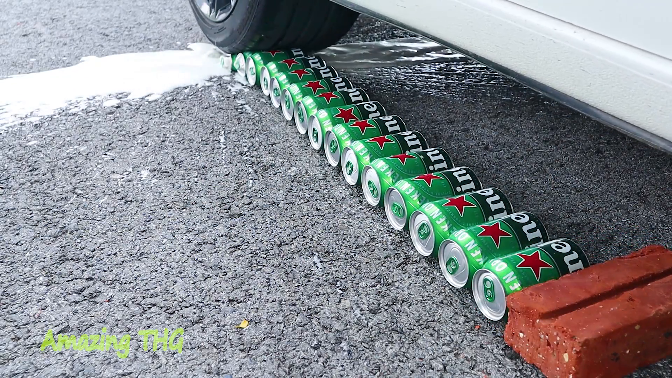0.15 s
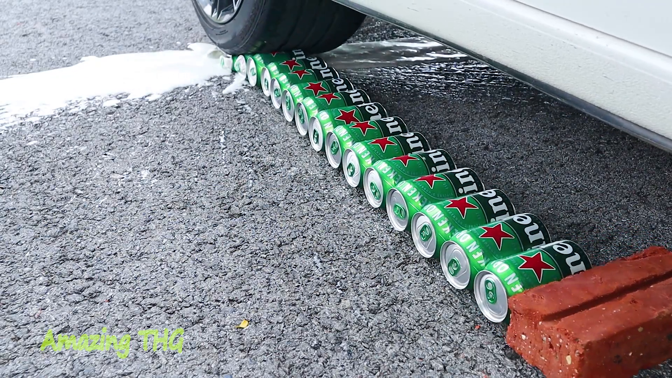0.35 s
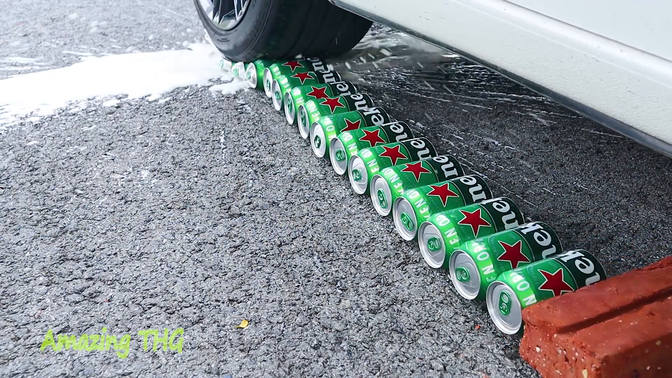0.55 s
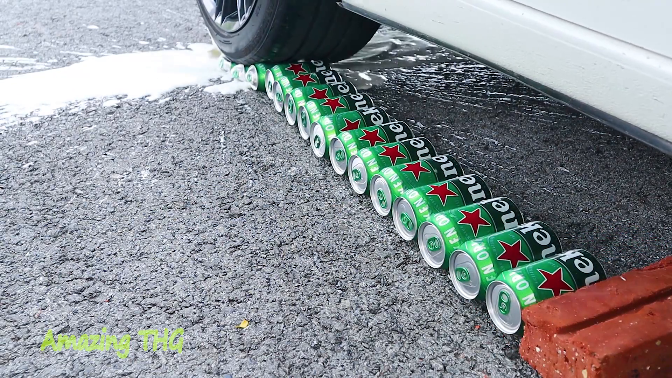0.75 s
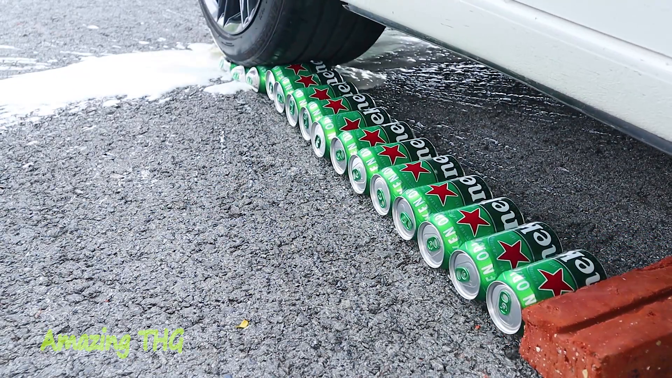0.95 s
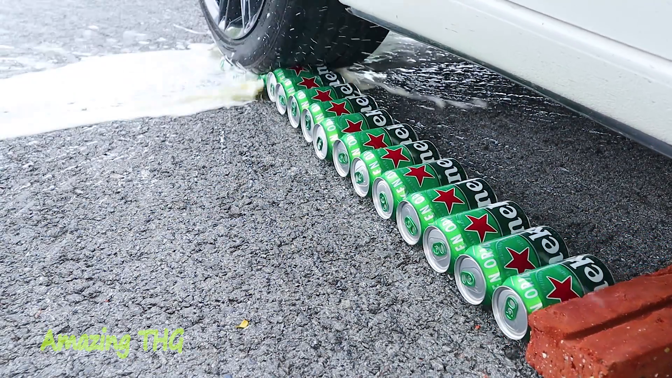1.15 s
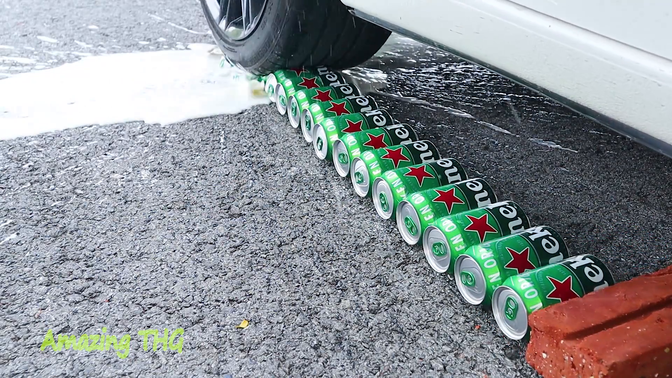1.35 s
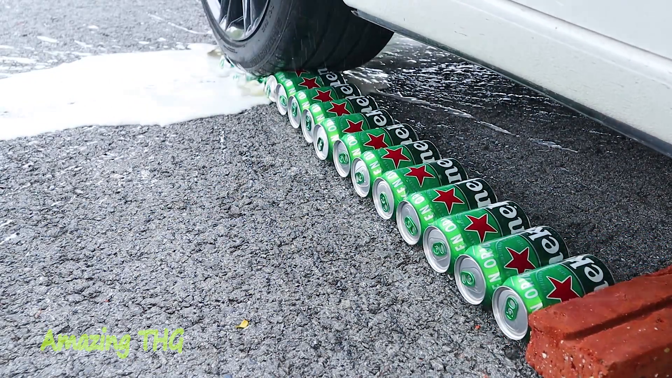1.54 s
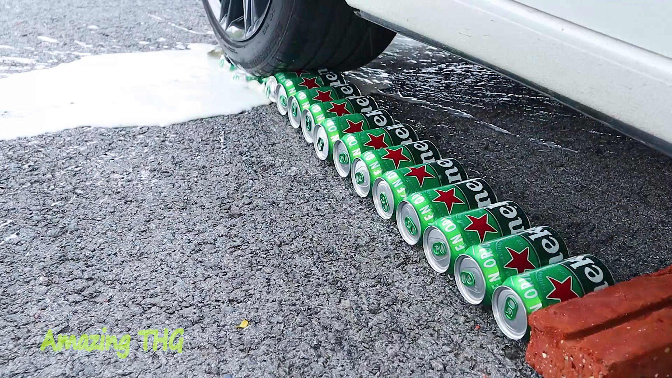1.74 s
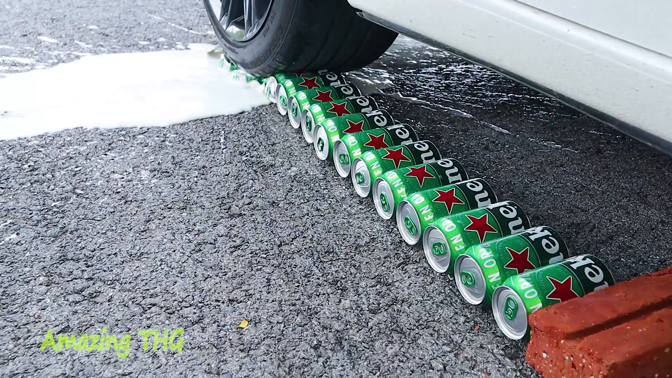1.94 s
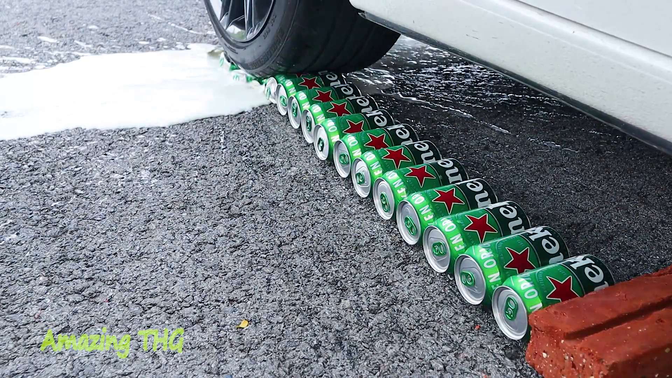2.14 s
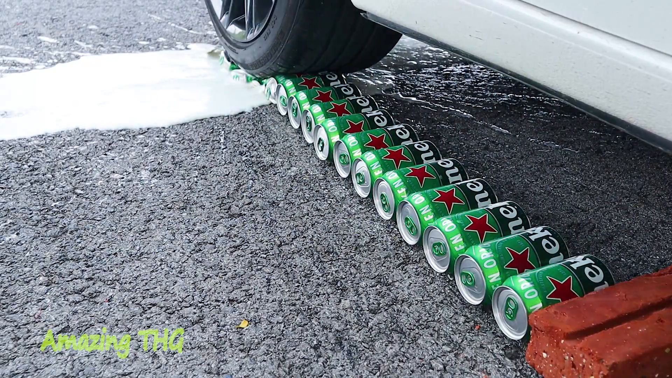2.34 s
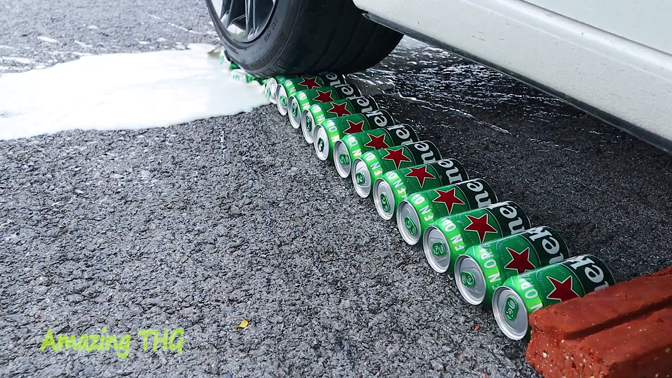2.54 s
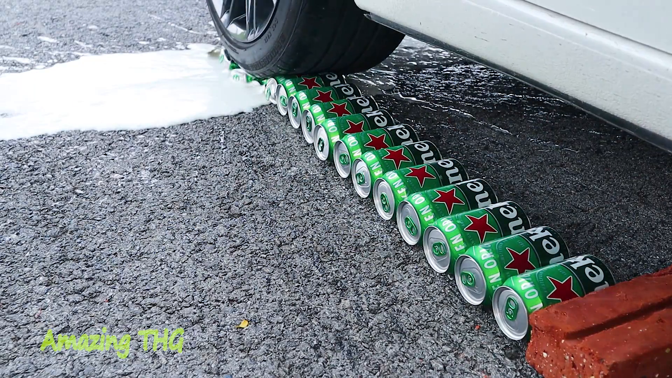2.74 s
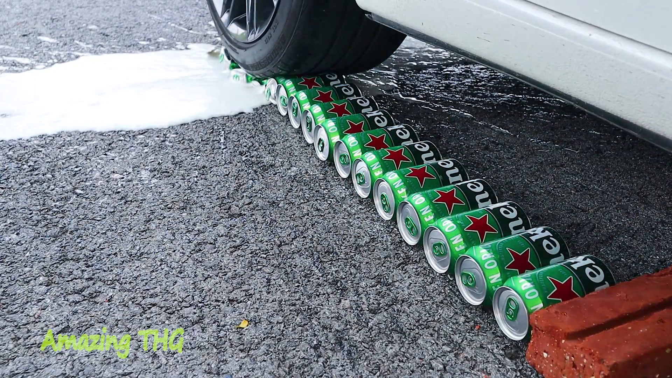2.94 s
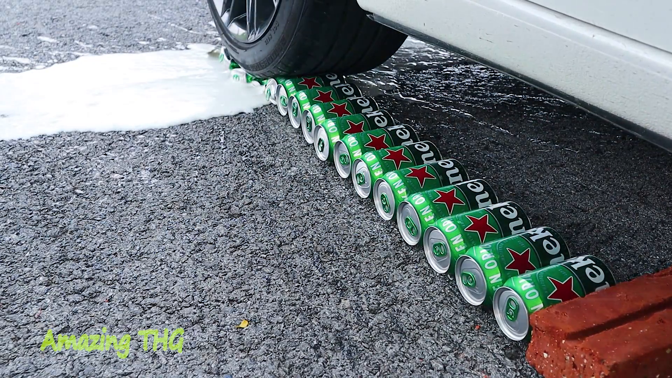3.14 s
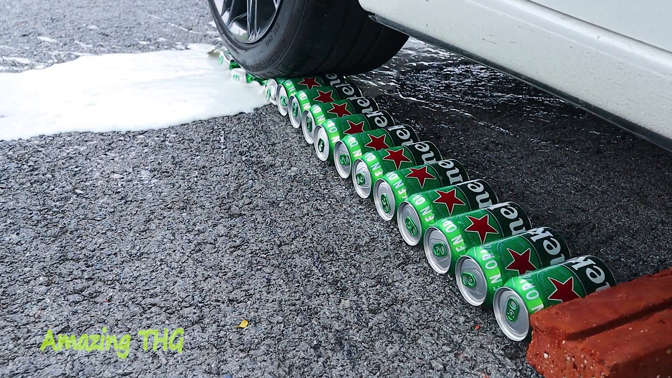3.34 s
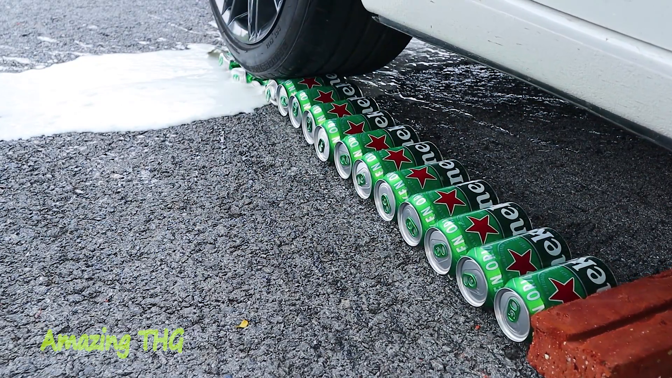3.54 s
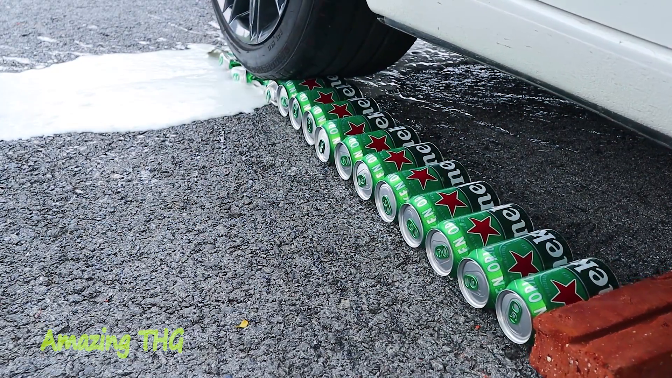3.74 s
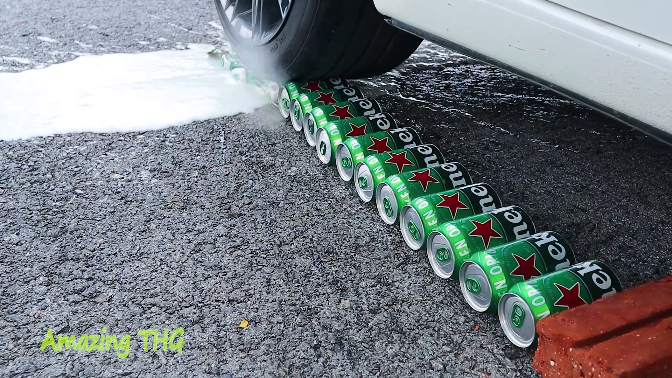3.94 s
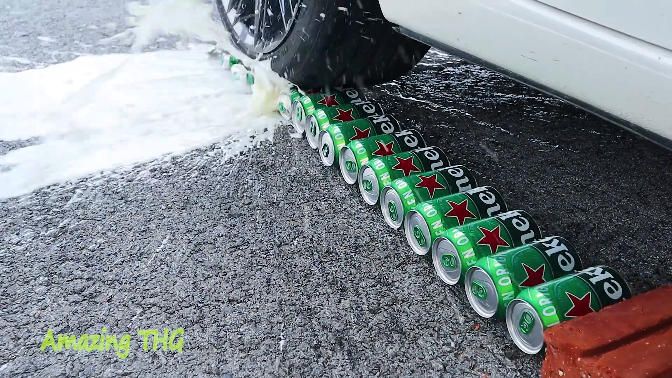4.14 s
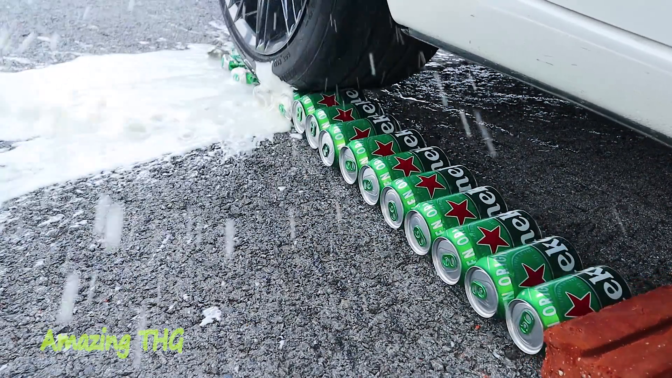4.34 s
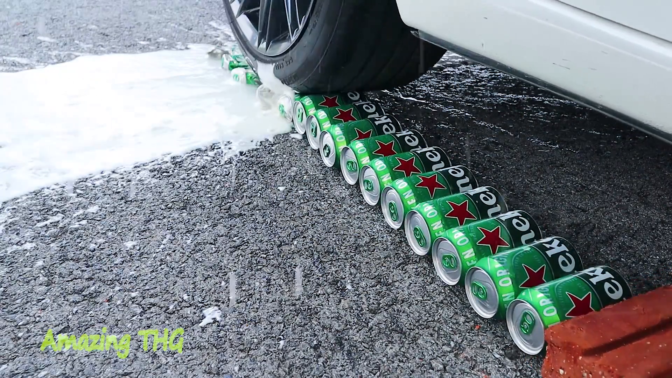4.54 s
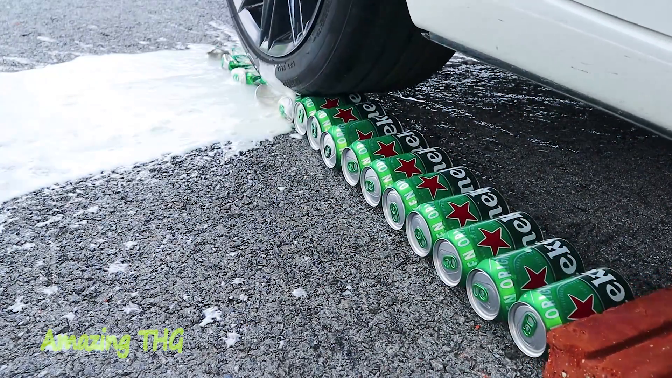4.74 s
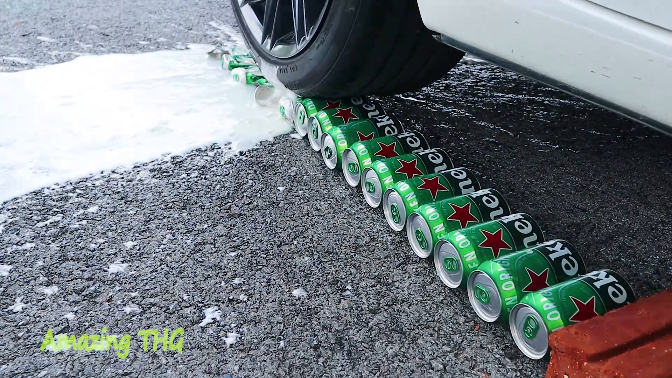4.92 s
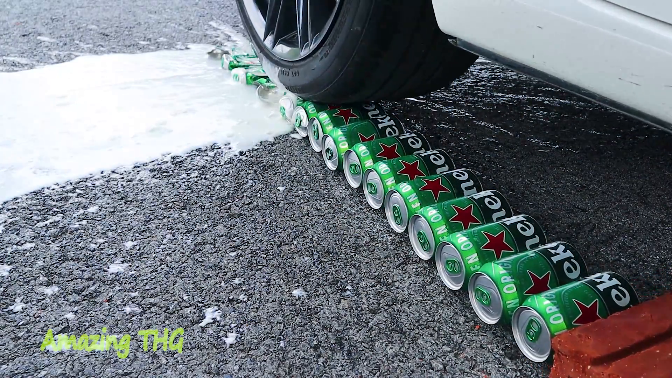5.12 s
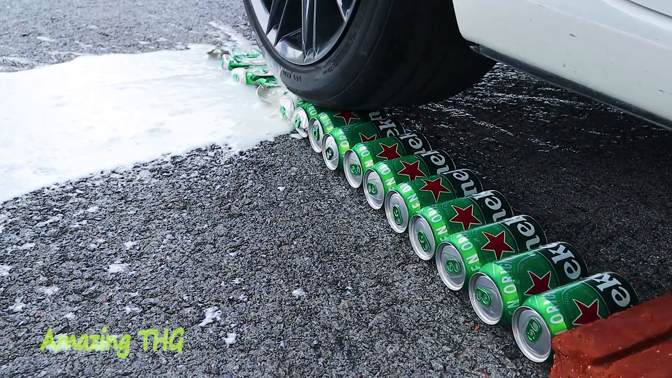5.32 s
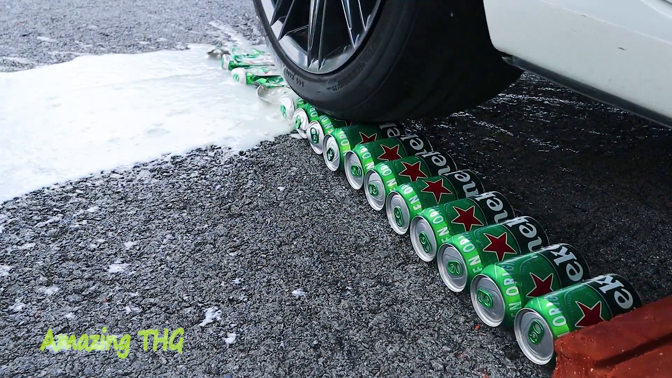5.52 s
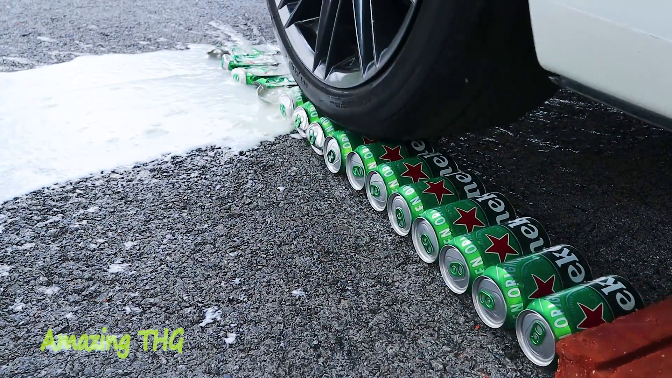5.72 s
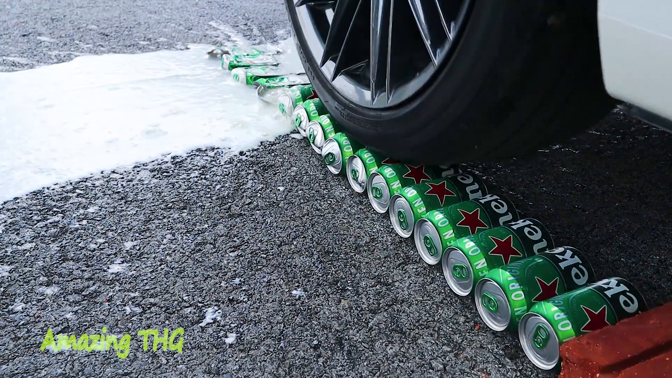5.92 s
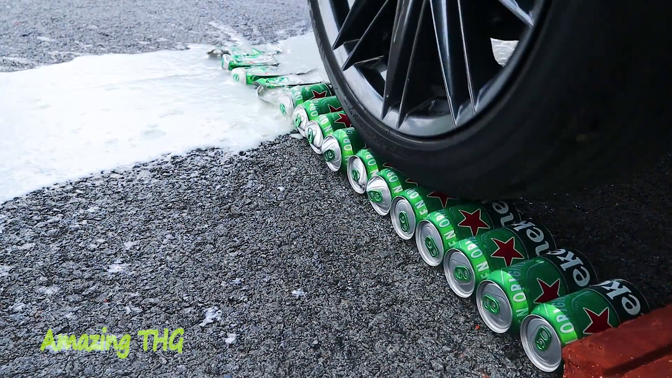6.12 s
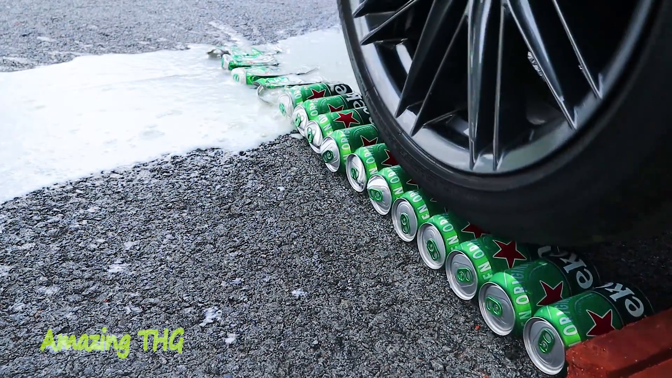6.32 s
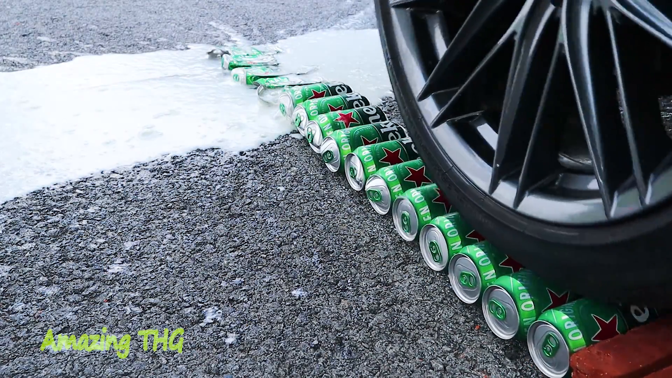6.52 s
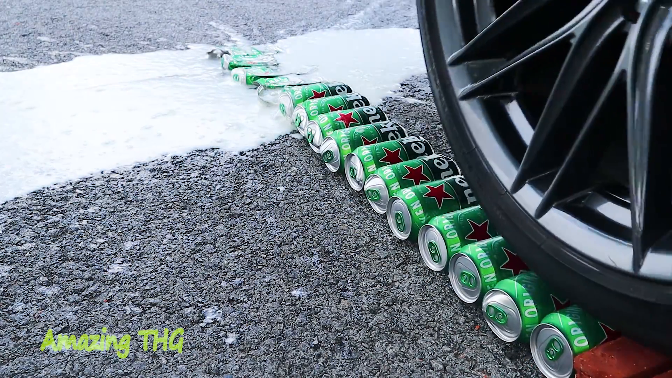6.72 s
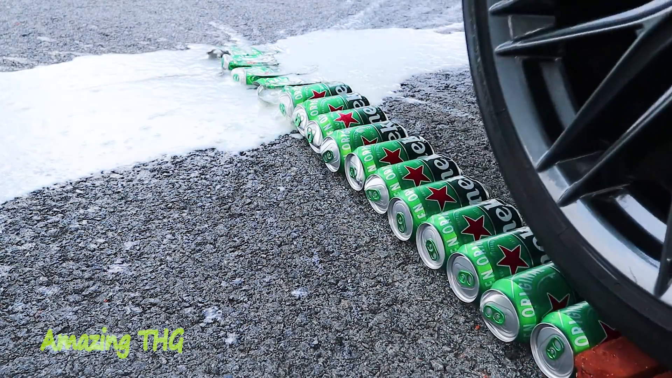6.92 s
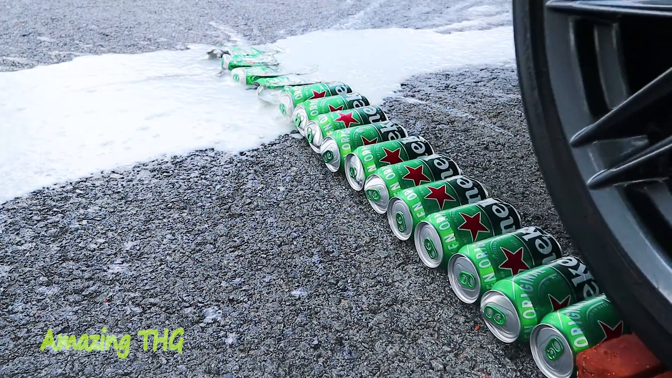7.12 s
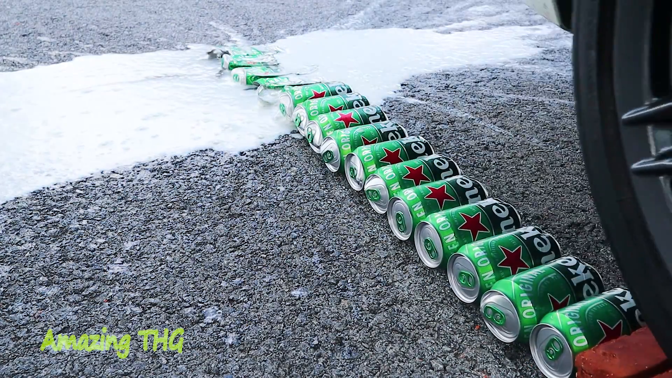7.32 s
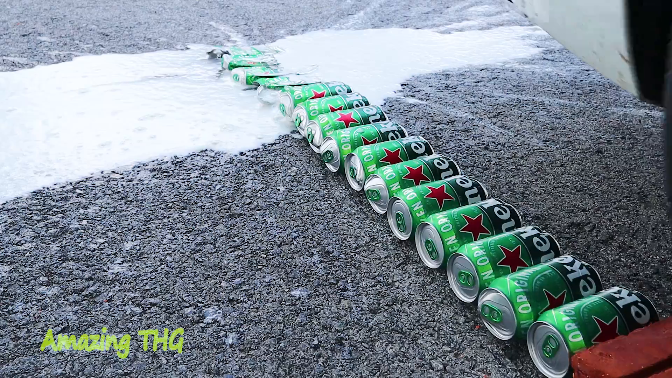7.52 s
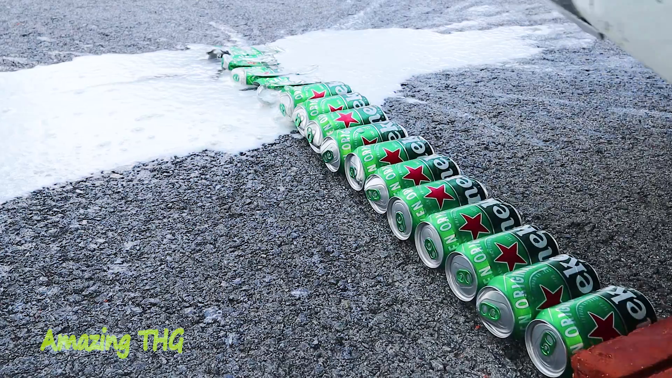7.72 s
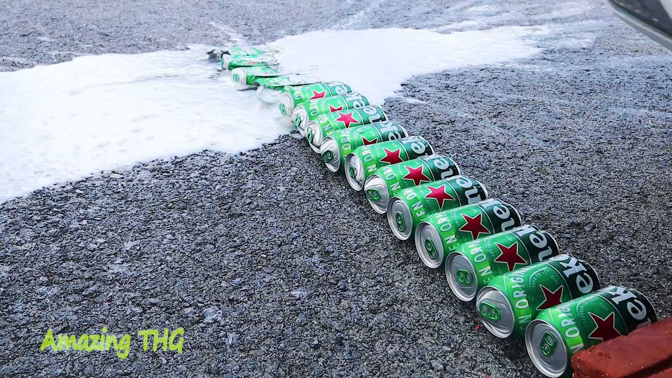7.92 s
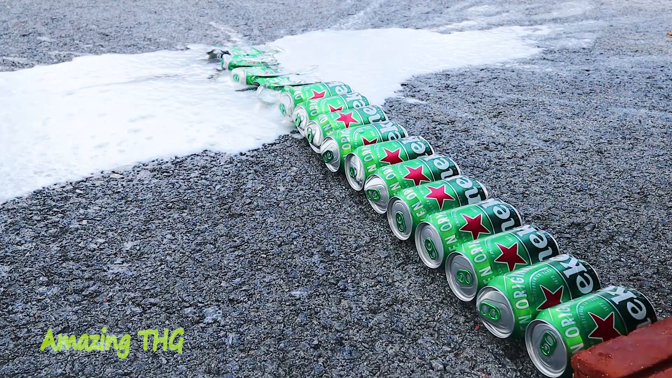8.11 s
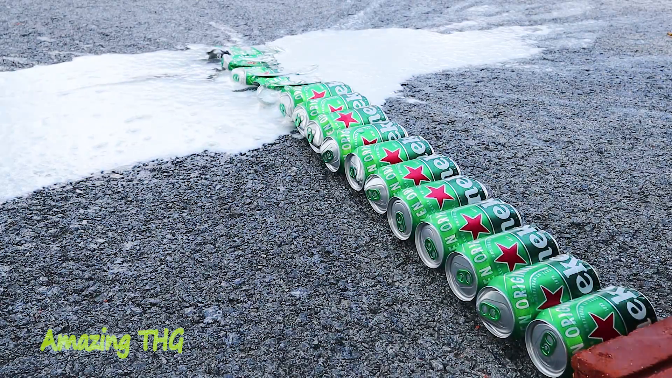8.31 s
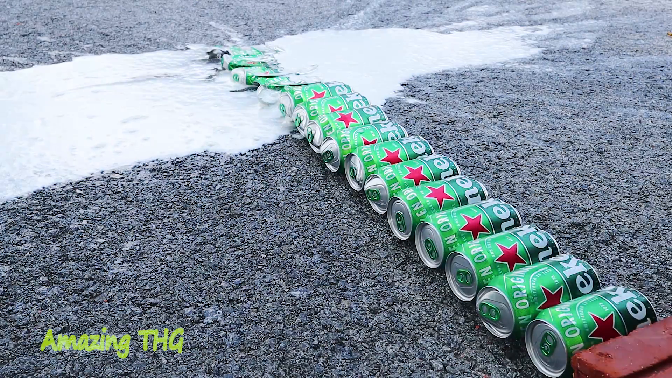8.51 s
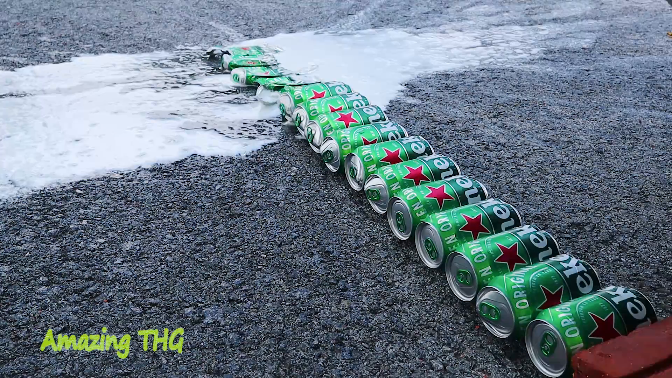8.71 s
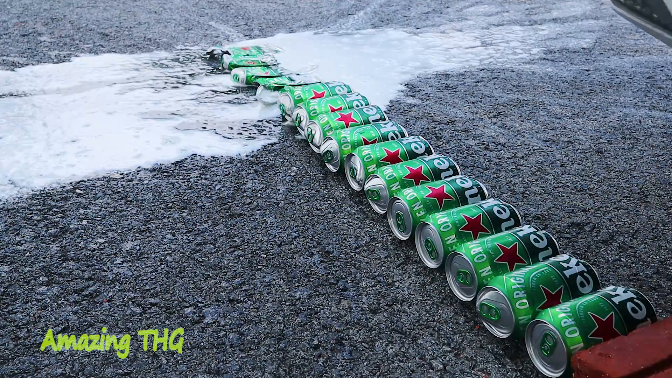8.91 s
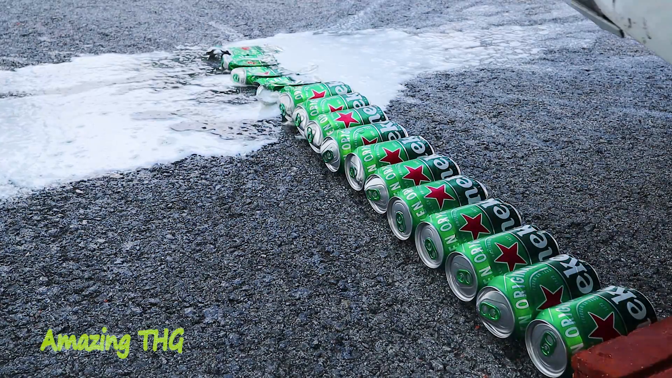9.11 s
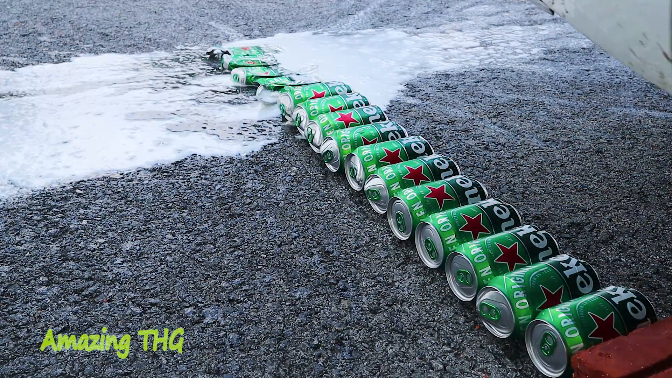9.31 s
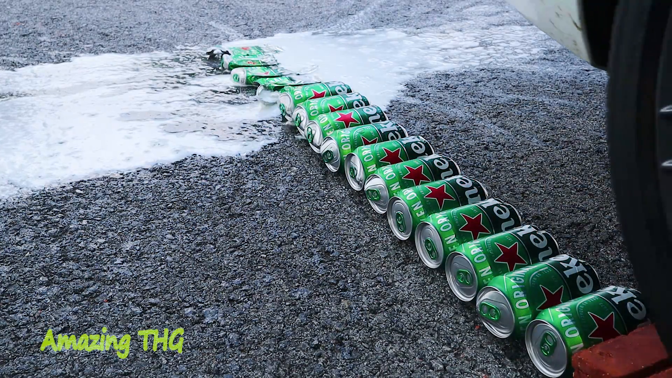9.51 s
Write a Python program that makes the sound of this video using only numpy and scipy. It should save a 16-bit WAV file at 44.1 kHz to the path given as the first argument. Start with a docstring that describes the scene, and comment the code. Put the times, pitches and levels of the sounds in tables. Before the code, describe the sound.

Sharp, loud crunching pops of drink cans being crushed by a creeping car wheel, spraying and fizzing, then quiet road noise and faint idling.

```python
"""Full aluminium cans buckle one after another under a car tyre creeping over asphalt.
Noisy bursts of small yields ring the can walls; the jolts also ring the air in the tyre and the wheel.
Small dents, rubber slips, a creak, rough swells of noise and spraying, fizzing foam lie between the cracks.
Behind them are street noise, an idling engine built on its shaft speed, a faint rattle and short whistles."""
import sys
import numpy as np
from scipy import signal
from scipy.fft import rfft, irfft
from scipy.io import wavfile
from scipy.ndimage import uniform_filter1d

SR = 44100
rng = np.random.default_rng(int(sys.argv[2]) if len(sys.argv) > 2 else 0)


def bounce(signal):
    """Save signal as a 16-bit WAV file at the path given by the first command-line argument."""
    frames = np.transpose(np.atleast_2d(signal))
    limited = np.clip(frames, -1, 1)
    pcm = np.round(limited * 32767).astype(np.int16)
    wavfile.write(sys.argv[1], SR, pcm)


def natural_amplitude(level_db):
    """Convert a level in decibels to a linear amplitude factor, elementwise."""
    exponent = np.asarray(level_db, float) / 20
    return 10 ** exponent


N = 421596
T = np.arange(N) / SR


def band(x, lo_hz, hi_hz):
    """Causal band-pass."""
    return signal.sosfilt(signal.butter(2, [lo_hz, hi_hz], "bandpass", fs=SR, output="sos"), x)


def unit(x):
    """Scale to rms 1."""
    return x / np.sqrt(np.mean(x ** 2))


def top(x):
    """Scale to peak 1."""
    return x / np.max(np.abs(x))


def curves(table):
    """Columns of a table, drawn as straight lines over time."""
    s, *columns = np.transpose(table)
    return [np.interp(T, s, c) for c in columns]


def coloured(points):
    """Noise of rms 1 with the given spectrum."""
    hz, db = np.transpose(points)
    f = np.maximum(np.arange(N // 2 + 1) * SR / N, 1)
    shape = natural_amplitude(np.interp(np.log(f), np.log(hz), db))
    return unit(irfft(rfft(rng.standard_normal(N)) * shape, N))


def walk(rate):
    """Random levels held 1 / rate s and slewed twice; spread 1."""
    k = int(SR / rate)
    held = np.repeat(rng.standard_normal(N // k + 1), k)
    return unit(uniform_filter1d(uniform_filter1d(held, k), k)[:N])


def swell(span):
    """A smooth rise and fall between two times."""
    return np.sin(np.pi * np.clip((T - span[0]) / (span[1] - span[0]), 0, 1))


def ring(x, hz, t60):
    """One decaying mode, driven by x."""
    pole = np.exp(2j * np.pi * hz / SR - np.log(1000) / (t60 * SR))
    return signal.lfilter([1], [1, -pole], x).imag


def ragged(count, ms, lump=32, lump_db=5.0, rise_ms=1.0):
    """Noises of 8192 samples in uneven lumps, rising quickly and dying with time constant ms."""
    t = T[:8192]
    lumps = natural_amplitude(lump_db * rng.standard_normal((count, len(t) // lump))).repeat(lump, axis=1)
    envelope = (1 - np.exp(-t / (rise_ms / 1000))) * np.exp(-t / (ms / 1000))
    return rng.standard_normal((count, len(t))) * lumps * envelope


def add(out, s, x):
    """Mix x into out from time s."""
    i = int(s * SR)
    out[i:i + len(x)] += x[:N - i]


# walls giving way: t/s, level/dB, ring centre f/Hz, thud level/dB re the ring, crumpling decay/ms
CRACKS = [(0.468, 2.5, 1701, -2.5, 18), (0.505, -1.5, 1722, -5, 27), (0.576, -6, 1426, -11, 41),
          (0.674, -23, 1436, 8, 25.5), (1.122, 2, 1503, 1, 9), (1.428, 1, 1612, -10, 4.5),
          (1.591, -5, 1353, -16.5, 26.5), (2.066, -18, 1510, -5.5, 29), (4.048, 1.5, 1285, 3.5, 8.7),
          (4.071, -3.5, 1543, -11, 47), (5.191, 1, 1529, -10, 20), (5.269, -24, 1300, 0, 17),
          (5.597, 0.5, 1590, -8.5, 19), (5.656, -5.5, 1137, -17, 17.34), (5.859, 2.5, 1455, -11.5, 9),
          (6, 1, 1636, -11, 9), (6.159, 1, 1497, -15.5, 10), (6.69, 3, 1560, -12.5, 6.2),
          (6.952, -23, 2000, -37.5, 22)]
# small dents and splashes: t/s, level/dB, note f/Hz, snap level/dB re the note
TICKS = [(0.054, -35.5, 1470, -34), (0.072, -30.5, 850, -22), (0.092, -39, 1900, 5), (0.24, -33, 1690, -27),
         (0.248, -27, 1510, -21), (0.269, -29.5, 1680, -27), (0.364, -28, 780, -10), (0.385, -31, 930, -17),
         (0.417, -31.5, 1900, -29.5), (0.717, -48, 2880, -12), (0.752, -32, 850, -35),
         (0.913, -35.5, 1520, -5), (1.094, -23.5, 2060, -29), (1.245, -19.5, 3330, -9),
         (1.267, -24, 3280, 5), (1.29, -41, 2380, -1), (1.313, -34, 2330, -4), (1.337, -22, 2405, -2),
         (1.561, -30.5, 3660, -6), (1.748, -30, 3630, -14), (1.771, -29.5, 3640, -17),
         (1.849, -45, 3680, -15), (1.916, -26, 1850, 4), (1.93, -29, 3410, -9), (1.963, -40, 2470, -3),
         (1.987, -36.5, 3300, -2), (2.232, -43, 3160, 0.5), (3.816, -24.5, 1907, -27),
         (3.857, -30, 1660, -36), (3.924, -31, 1710, -14), (4.152, -23.5, 890, -28),
         (4.186, -35, 1790, -12), (4.291, -32, 1200, -37.5), (4.395, -34.5, 1296, -21),
         (4.466, -39.5, 1440, -25), (4.494, -32.5, 1190, -26), (4.512, -45, 2860, -11),
         (4.54, -19.5, 2350, -33), (4.613, -24, 1110, -32), (4.691, -35, 1580, -18),
         (4.719, -30, 1180, -30), (4.824, -35, 2520, -13), (5.012, -25.5, 1100, -7),
         (5.114, -31.5, 766, -36), (5.748, -23, 1460, -38), (5.784, -32.5, 2830, -27),
         (6.799, -36, 1750, -22.5), (6.831, -29, 1900, -11), (7.425, -33.5, 1726, -25),
         (7.498, -34, 1114, -41)]
# the tread slipping on a can, in runs: t/s, level/dB
SLIPS = [(0.311, -29), (0.324, -28), (0.33, -31), (0.337, -38), (2.363, -26.5), (2.646, -39),
         (2.692, -32.5), (2.925, -34.5), (2.979, -22.5), (3.041, -19), (3.206, -25), (3.299, -27),
         (3.364, -28.5), (3.404, -30), (3.465, -28), (3.501, -28.5), (3.524, -29.5), (3.543, -33),
         (3.564, -32), (3.596, -30.5), (3.613, -35), (3.624, -27.5), (3.656, -33.5), (3.667, -40),
         (3.677, -34), (3.701, -36), (3.725, -37.5)]
# drops of foam hitting metal: t/s, level/dB
SPATTERS = [(.94, -43.5), (1.179, -40.5), (4.411, -45), (4.706, -39.5), (4.921, -49), (5.456, -41),
            (5.773, -41), (6.67, -47.5), (6.68, -37), (6.733, -39), (6.779, -45.5), (6.856, -44.5)]
# something loose knocking under the car: t/s, level/dB
KNOCKS = [(8.694, -47), (8.722, -39.5), (8.765, -37), (8.812, -40)]
ECHO_T60_S, ECHO_DB = 0.081, -17


def cans():
    """Cracks, ticks, slips, spatters and knocks, smeared by echoes between road and car floor."""
    out = np.zeros(N)
    events = [(CRACKS, buckle), (TICKS, tick), (SLIPS, slip), (SPATTERS, spatter), (KNOCKS, knock)]
    for table, sound in events:
        for s, db, *colour in table:
            add(out, s, natural_amplitude(db) * sound(*colour))
    t = T[:SR // 2]
    decay = np.exp(-np.log(1000) * t / ECHO_T60_S) * (1 - np.exp(-t / 0.00017))
    tail = band(rng.standard_normal(len(t)), 330, 3100) * decay
    echo = signal.fftconvolve(out, tail / np.linalg.norm(tail))[:N]
    return band(out + natural_amplitude(ECHO_DB) * echo, 120, 19845)  # the microphone passes little bass


# modes of a can wall: f/Hz, level/dB, t60/s
WALL_MODES = [(1300, -5, .018), (1460, 0, .025), (1620, 0, .018), (1900, -1, .016), (2150, -3, .014),
              (2470, -5, .012), (2800, -6, .012), (3200, -7, .01), (3700, -8, .009), (4400, -10, .008),
              (5500, -12, .006)]
BUCKLE_MS, BUCKLE_RISE_MS, PANEL_T60_S = 2, 2.2, 0.025
CRUMPLE_DB = -15
SNAP_DB, SNAP_PER_THUD = -23.5, 0.05  # the crease snaps louder with more thrown liquid: dB, dB per dB of thud
WET_DAMPING = .8  # thrown liquid chokes the panel: dB per dB of thud over -9


def buckle(centre_hz, thud_db, crumple_ms):
    """Small yields ring the wall modes near the centre; liquid thuds, the crease snaps, crumpling follows."""
    yields = ragged(count=3, ms=BUCKLE_MS, rise_ms=BUCKLE_RISE_MS)
    wall = np.zeros(8192)
    for hz, db, t60 in WALL_MODES:
        octaves = np.log2(hz / centre_hz)
        reach_db = 30 * octaves if octaves < 0 else -6 * octaves  # modes below the centre hardly join in
        detune = 1 + 0.06 * rng.standard_normal()
        wall += natural_amplitude(db + reach_db) * top(ring(yields[0], hz * detune, t60))
    # the panel that folds rings clearest
    choke = natural_amplitude(-WET_DAMPING * max(thud_db + 9, 0))
    wall += 1.4 * choke * top(ring(yields[0], centre_hz, PANEL_T60_S))

    after = ragged(count=2, ms=crumple_ms, lump=64, lump_db=3, rise_ms=4)
    crumple = 0.86 * top(band(after[0], .85 * centre_hz, 1.8 * centre_hz))
    crumple += 0.45 * top(band(after[1], 370, 4000))

    thud = band(yields[1], .23 * centre_hz, 0.61 * centre_hz)
    late_snaps = natural_amplitude(CRUMPLE_DB) * after[1] * np.exp(-T[:8192] / 0.041)
    snap = band(yields[2] + late_snaps, 4600, 14000)
    snap_db = SNAP_DB + SNAP_PER_THUD * thud_db
    crack = top(band(wall, 0.85 * centre_hz, 5600)) + natural_amplitude(thud_db) * top(thud) + natural_amplitude(snap_db) * top(snap)
    return top(crack) + natural_amplitude(CRUMPLE_DB) * crumple


# a chattering lid: multiple of its note, level/dB
LID_NOTES = [(.7, -9.5), (1.12, -7.5), (1.8, -10.5), (2.1, -14.5)]
DENT_MS, LID_MS = 4.6, 18  # typical ring time (t60) of a dent and of the stiff lid
CHATTER_MS = 2.5  # decay of the lid's chatter


def tick(note_hz, snap_db):
    """One panel pops: note, broad rustle, a little body, bright snap; a lid chatters on several notes."""
    lid = note_hz > 3000
    yields = ragged(count=3, ms=CHATTER_MS if lid else 1.3)
    ring_ms = (LID_MS if lid else DENT_MS) * natural_amplitude(2 * rng.standard_normal())
    note = top(band(ring(yields[0], note_hz, ring_ms / 1000), note_hz / 2, note_hz * 2))
    if lid:
        for k, db in LID_NOTES:
            note += natural_amplitude(db) * top(ring(yields[2], k * note_hz, ring_ms / 2000))
    rustle = top(band(yields[1], note_hz / 1.6, note_hz * 1.8)) * 6 / ring_ms  # dull pops rustle most
    body = top(band(yields[1], 320, 1300)) * 300 / note_hz
    snap = top(band(band(yields[2], 2000, 9000), 2000, 9000))
    return top(note + rustle + body + natural_amplitude(snap_db) * snap)


SLIP_HZ = 1660  # typical note


def slip():
    """Rubber lets go softly: two rounded cycles, a faint bright edge and a lower swing of the can."""
    t = T[:512]
    note_hz = SLIP_HZ * (1 + 0.152 * rng.standard_normal())
    release = top(np.sin(2 * np.pi * note_hz * t - 1.9) * (t / .0003) ** 2 * np.exp(-t / .0003))
    edge = top(band(rng.standard_normal(len(t)) * np.exp(-t / .0012), 2500, 4900))
    swing = top(np.sin(2 * np.pi * 600 * t) * t * np.exp(-t / 0.00097))
    return 0.19 * swing - release + natural_amplitude(-17.0) * edge


def spatter():
    """A drop lands as a bright splat of noise without body."""
    return top(band(ragged(count=1, ms=2.6)[0], 4600 * natural_amplitude(rng.standard_normal()), 14000))


# metal left ringing by a knock: f/Hz, level/dB, t60/s
KNOCK_RINGS = [(950, 0, .05), (1485, -2, .12), (2050, -2, .03)]
KNOCK_MS = 28


def knock():
    """A rough, full mid-range blow that leaves metal ringing."""
    rub = ragged(count=1, ms=KNOCK_MS, lump_db=2.5)[0]
    metal = sum(natural_amplitude(db) * top(ring(rub, hz, t60)) for hz, db, t60 in KNOCK_RINGS)
    blow = top(band(rub, 335, 1820)) + natural_amplitude(-25) * top(band(rub, 2000, 3560))
    return top(blow + natural_amplitude(-7.5) * metal)


# resonances of the air in the tyre: f/Hz, level/dB, t60/s
TYRE_AIR = [(211.5, 0, .6), (415, -16, .25)]
# jolts through the tyre; the first is left from an earlier can: t/s, tyre air level/dB, wheel level/dB
JOLTS = [(0, -41, -46.5), (0.467, -25.5, -55.5), (0.674, -42, -57), (1.122, -50.5, -59), (1.429, -37, -47),
         (1.593, -41, -45.5), (2.066, -40.5, -62), (4.053, -32.5, -44), (5.19, -39, -46.5),
         (5.273, -52, -44.5), (5.6, -39, -45), (5.86, -44, -58), (6, -42.5, -45), (6.159, -44, -39.5),
         (6.691, -42.5, -42.5)]
WHEEL_HZ, WHEEL_T60_S = 615, .46


def tyre():
    """Each jolt rings the air inside the tyre and the wheel; the rings waver as the tread deforms."""
    air, wheel, push = np.zeros(N), np.zeros(N), np.hanning(40) / 20
    for s, air_db, wheel_db in JOLTS:
        add(air, s, natural_amplitude(air_db) * push)
        add(wheel, s, natural_amplitude(wheel_db) * push)
    air_rings = sum(natural_amplitude(db) * ring(air, hz, t60) for hz, db, t60 in TYRE_AIR) * natural_amplitude(2.5 * walk(20))
    wheel_ring = ring(wheel, WHEEL_HZ, WHEEL_T60_S) * natural_amplitude(4 * walk(40))
    return band(air_rings + wheel_ring, 120, 2000)


# cans splitting open: t/s, air thump level/dB, its low edge f/Hz, spray level/dB, spray decay/ms
BURSTS = [(0.47, -20.5, 130, -37, 130), (1.124, -26.5, 30.33, -36.5, 93), (4.049, -16.5, 25, -49, 400)]
# a split can ringing on: f/Hz, level/dB, t60/s
OPEN_CAN = [(643, -2, .5), (931, -3, .17), (1281, 2, .35), (1560, 0, .3), (2200, 0, .2)]
OPEN_CAN_DB = -16  # re the air thump
TEAR_DB, TEAR_S = 9.5, 0.0012  # bright hiss of the ripping seam: level re the air thump, time constant


def bursts():
    """Escaping gas gives one low pulse and rings the split can; liquid spits out in a fading spray."""
    out, t = np.zeros(N), T[:16384]
    for s, thump_db, low_hz, spray_db, ms in BURSTS:
        thump = top(band(band(np.exp(-t / 0.002), low_hz, 900), low_hz, 900))
        for hz, db, t60 in OPEN_CAN:
            thump = thump + natural_amplitude(OPEN_CAN_DB + db) * np.sin(2 * np.pi * hz * t) * 1000 ** (-t / t60)
        drop_sizes = natural_amplitude(4 * rng.exponential(size=len(t) // 128)).repeat(128)
        drops = drop_sizes * rng.standard_normal(len(t))
        thump = thump + natural_amplitude(TEAR_DB) * top(band(drops, 1700, 12000) * np.exp(-t / TEAR_S))
        spurts = natural_amplitude(3.5 * rng.standard_normal(len(t) // 512)).repeat(512)
        bright = np.exp(-t / 0.1) * unit(band(drops * spurts, 4000, 13000))
        spray = (unit(band(drops, 700, 3000)) + 0.49 * bright) * np.exp(-t / (ms / 1000))
        add(out, s, natural_amplitude(thump_db) * thump + natural_amplitude(spray_db) * spray)
    return out


# walls grinding, or liquid splattering: t/s, length/s, pitch of the noise f/Hz, level/dB
ROUGH_SWELLS = [(0, 0.05, 1330, -43.5), (1.599, 0.052, 2150, -35), (4.084, 0.054, 2490, -31),
                (0.229, 0.054, 1550, -42), (1.271, 0.033, 2640, -43), (5.798, 0.065, 3530, -48),
                (6.495, 0.1, 2630, -49.5), (6.627, 0.071, 2650, -49), (6.785, 0.032, 2487, -46)]


def rough_swells():
    """Rough swells of lumpy noise about an octave and a third wide: walls grinding, or liquid splattering."""
    out = np.zeros(N)
    for s, length, hz, db in ROUGH_SWELLS:
        n = int(length * SR)
        lumps = natural_amplitude(5 * rng.standard_normal(256)).repeat(48)[:n]
        rough = unit(band(lumps * rng.standard_normal(n), hz / 2.1, hz * 1.2))
        add(out, s, natural_amplitude(db) * np.hanning(n) ** .5 * rough)
    return out


# rubber stuttering over a wall: t/s, slips per second, moving ring f/Hz
CREAK = [(.09, 165, 2900), (.155, 172, 3600), (.18, 135, 3900), (.21, 155, 3950), (.245, 260, 4300)]
CREAK_START_S, CREAK_END_S, CREAK_ATTACK_S, CREAK_DB = .09, .245, .015, -40


def creak():
    """Sharp stick-slip pulses through a rising ring and three fixed ones."""
    rate, hz = curves(CREAK)
    since_slip = np.cumsum(rate * (1 + 0.046 * walk(110))) / SR % 1 / rate

    def pulse(ring_hz, ms):
        """A decaying sine restarted by every slip."""
        return np.exp(-since_slip / (ms / 1000)) * np.sin(2 * np.pi * ring_hz * since_slip)

    rings = swell((.11, .27)) * pulse(hz, .7) + .35 * swell((.09, .17)) * pulse(6100, .5)
    rings += swell((.03, .23)) * (1.7 * pulse(2200, 1.6) + 1.1 * pulse(900, .9))
    attack = np.clip((T - CREAK_START_S) / CREAK_ATTACK_S, 0, 1)
    return band(natural_amplitude(CREAK_DB + 1.6 * walk(120)) * rings * attack * (T < CREAK_END_S), 600, 7500)


# spectrum of the foam: f/Hz, relative level/dB per Hz
FOAM = [(1500, -7), (3000, 6.5), (6000, -1), (10000, -6), (15500, -7), (16200, -29.5)]
# how much foam is fizzing out of the cans: t/s, level/dB
FIZZ = [(0, -70), (.45, -74), (.5, -59.5), (.75, -75), (1.1, -72), (1.14, -58.5), (1.3, -56), (1.4, -62),
        (1.71, -69), (2.84, -75), (4.03, -68.5), (4.06, -55), (4.128, -53), (4.136, -65), (4.3, -73),
        (4.7, -58.5), (4.84, -69), (5.47, -73), (5.79, -68), (6.22, -73.5), (6.47, -71), (6.55, -65),
        (6.71, -65.5), (6.82, -62.5), (6.89, -78), (7.1, -74), (9.56, -98)]


def foam():
    """Bubbles burst in uneven sizes, as coloured noise in random grains."""
    grains = natural_amplitude(2.2 * rng.exponential(size=N // 64)).repeat(64)
    crackle = unit(coloured(FOAM) * np.resize(grains, N)) * natural_amplitude(2.5 * walk(30))
    fizz_db, = curves(FIZZ)
    return natural_amplitude(fizz_db) * crackle


# spectrum of tyre and street noise: f/Hz, relative level/dB per Hz
STREET = [(59, -42), (110, -12), (433, -8), (547, -7), (705, -8), (1010, -10.5), (1170, -6), (3190, -14.5),
          (3780, -19.5), (4570, -28.5), (16000, -43.5)]
# how hard the tyre works on the cans, as the level of the rolling noise: t/s, level/dB
LOAD = [(0.0, -47.5), (0.32, -54.5), (0.53, -45.5), (0.88, -55.5), (1.14, -56), (1.3, -57), (1.73, -59),
        (2.9, -58.5), (4.13, -55), (5.56, -57.5), (5.8, -52), (6.26, -55.5), (6.73, -56.5), (7.03, -59),
        (8.02, -65), (9.56, -64)]


def street():
    """Tyre and street noise: one coloured noise that flickers and follows the load."""
    load_db, = curves(LOAD)
    return natural_amplitude(load_db) * coloured(STREET) * natural_amplitude(1.2 * walk(40))


# the idling shaft: t/s, shaft speed f/Hz, level/dB
ENGINE = [(0, 25.8, -72), (2.7, 23.7, -74), (3.95, 26.4, -67), (4.3, 24.3, -78), (6.5, 21.6, -77),
          (7.7, 20.2, -78), (8.65, 20, -79), (8.75, 21.3, -76), (9.2, 21, -77), (9.56, 19.9, -79)]
# engine orders: multiple of the shaft speed, level/dB
ORDERS = [(3, -0.5), (4, -2), (5, -2), (7, -8), (10, -4)]


def engine():
    """Wavering low multiples of the shaft speed over a rumble."""
    hz, db = curves(ENGINE)
    turns = np.cumsum(hz * (1 + 0.005 * walk(4))) / SR
    lines = sum(natural_amplitude(g_db + 2 * walk(6)) * np.sin(2 * np.pi * k * turns) for k, g_db in ORDERS)
    rumble = unit(band(rng.standard_normal(N), 20, 350))
    return natural_amplitude(db) * (lines + natural_amplitude(-5.0) * rumble)


RATTLE_S, RATTLE_DB = (7.814, 9.42), -65  # start and end, top level


def rattle():
    """Regular noisy taps near 1 kHz, paced by the shaft speed."""
    hz = curves(ENGINE)[0]
    turns = np.cumsum(hz) / SR
    since_tap = (turns - np.interp(RATTLE_S[0], T, turns)) % 1 / hz
    envelope = (.06 + np.exp(-since_tap / .009)) * (1 - np.exp(-since_tap / .003))
    taps = unit(band(rng.standard_normal(N) * envelope, 846, 1120))
    return natural_amplitude(RATTLE_DB) * swell(RATTLE_S) ** .5 * taps


# short whistles: t/s, length/s, start f/Hz, end f/Hz, level/dB
WHISTLES = [(0.426, 0.046, 2400, 2543, -50), (3.769, 0.029, 2440, 2480, -53),
            (3.99, 0.046, 2520, 2550, -53), (4.785, 0.062, 2490, 2540, -51),
            (5.449, 0.093, 2770, 2840, -57.5), (6.453, 0.036, 2470, 2550, -53.5),
            (7.565, 0.046, 2536, 2420, -55), (7.868, 0.082, 3860, 3700, -68),
            (8.045, 0.11, 3880, 3660, -71.5), (8.777, 0.125, 3740, 3730, -70)]


def whistles():
    """Faint gliding sines: squeaks near the wheel, then higher ones like a far bird."""
    out = np.zeros(N)
    for s, length, from_hz, to_hz, db in WHISTLES:
        n = int(length * SR)
        turns = np.cumsum(np.linspace(from_hz, to_hz, n)) / SR
        add(out, s, natural_amplitude(db) * np.hanning(n) * np.sin(2 * np.pi * turns))
    return out


def scene():
    """All sources at one microphone."""
    near = cans() + tyre() + bursts() + rough_swells() + creak() + foam()
    return (near + street() + engine() + rattle() + whistles())[None]


def low_pass(x):
    """Removes everything above the highest recorded frequency."""
    return signal.sosfilt(signal.butter(12, 16450, fs=SR, output="sos"), x)


def record(dry):
    """Faint circuit hiss joins, the top is cut, and the loudest cracks clip at full scale."""
    hiss = natural_amplitude(-75.0) * rng.standard_normal(dry.shape)
    cut = signal.ellip(6, .2, 50, 16200, fs=SR, output="sos")
    mix = np.clip(signal.sosfilt(cut, dry + hiss), -1, 1)
    return low_pass(mix)


dry = scene()
out = record(dry)
bounce(out)
```